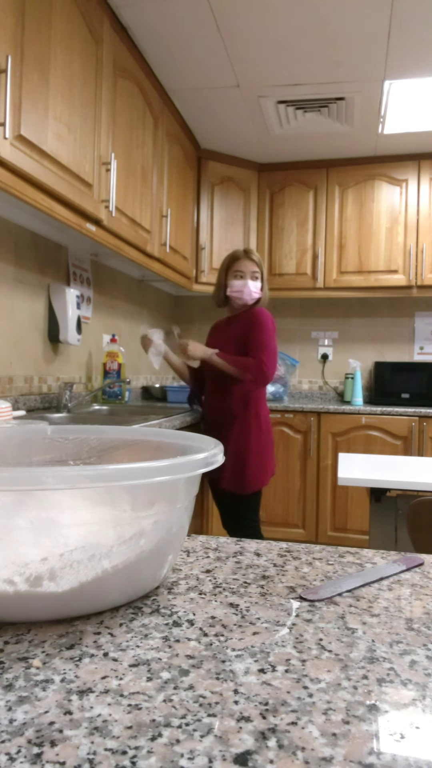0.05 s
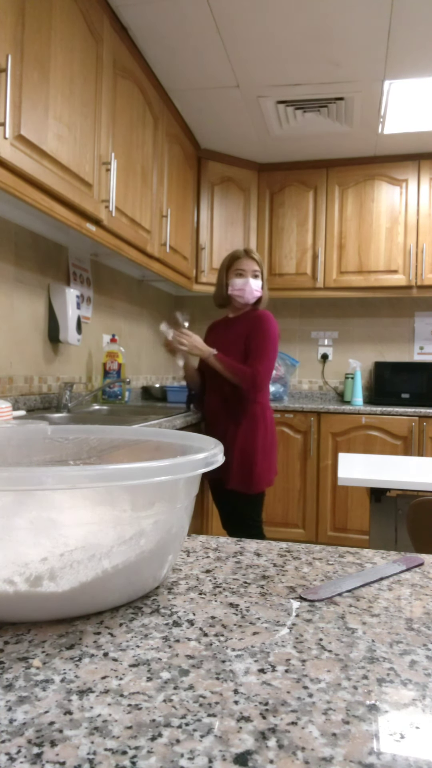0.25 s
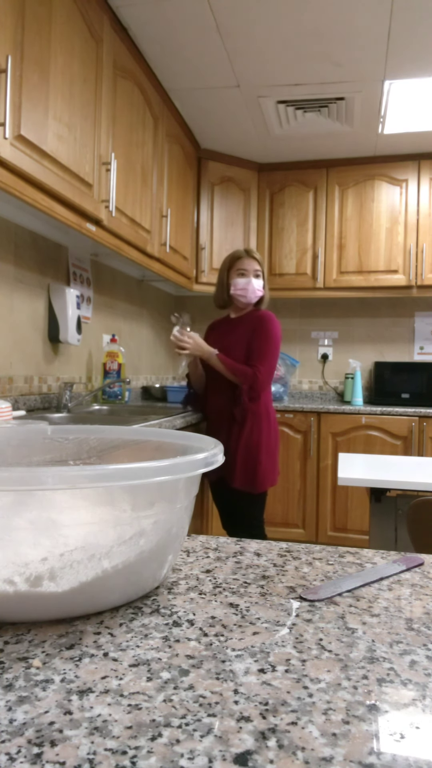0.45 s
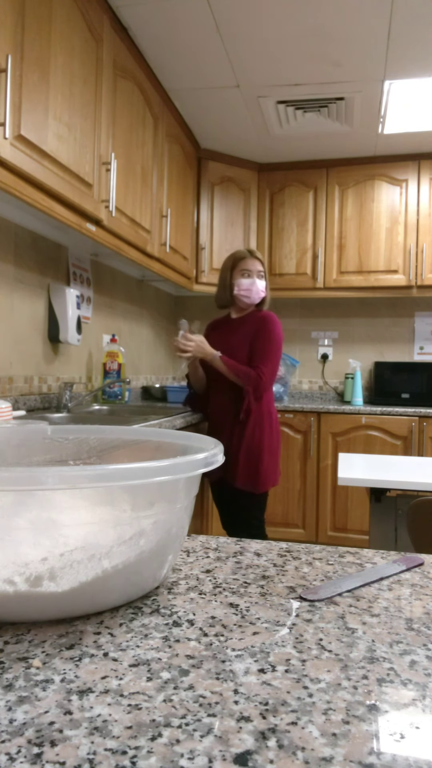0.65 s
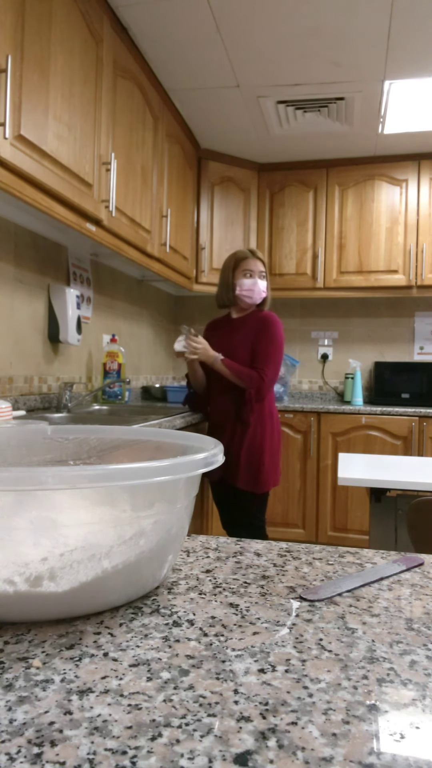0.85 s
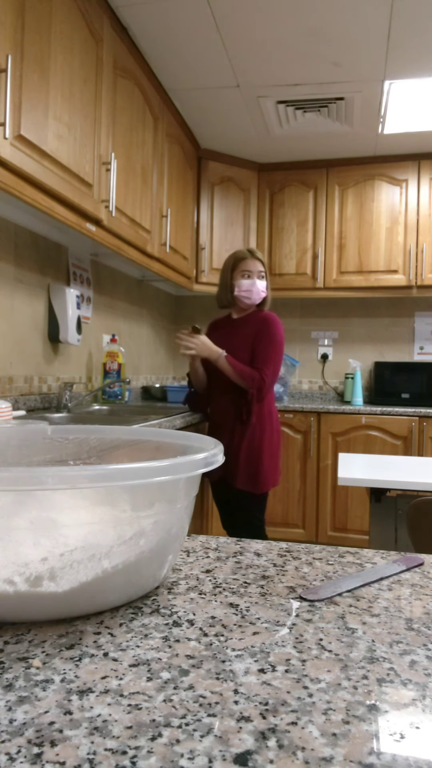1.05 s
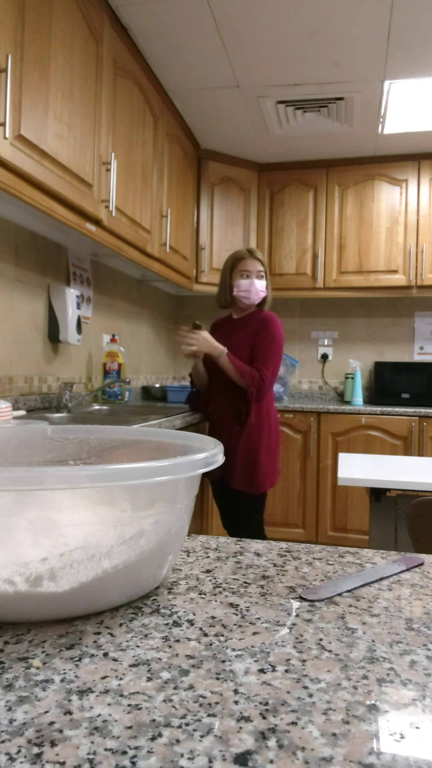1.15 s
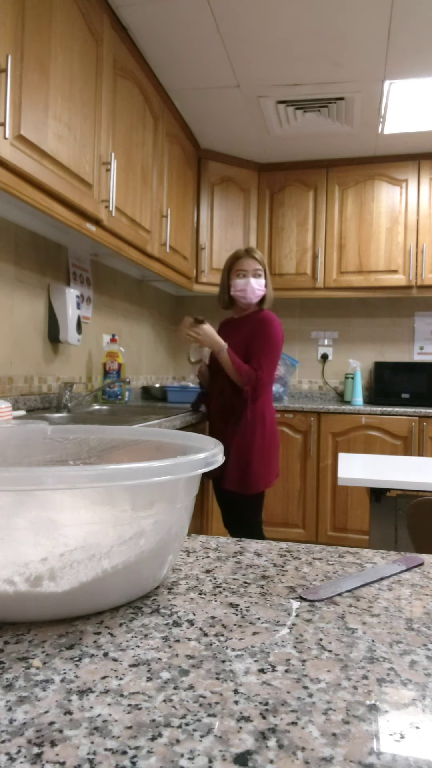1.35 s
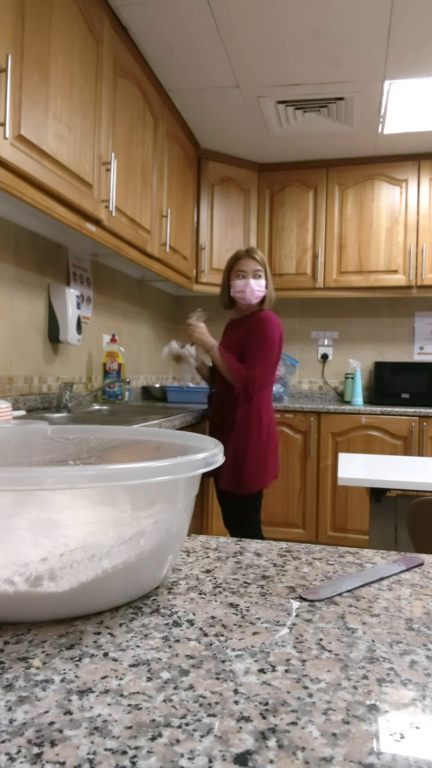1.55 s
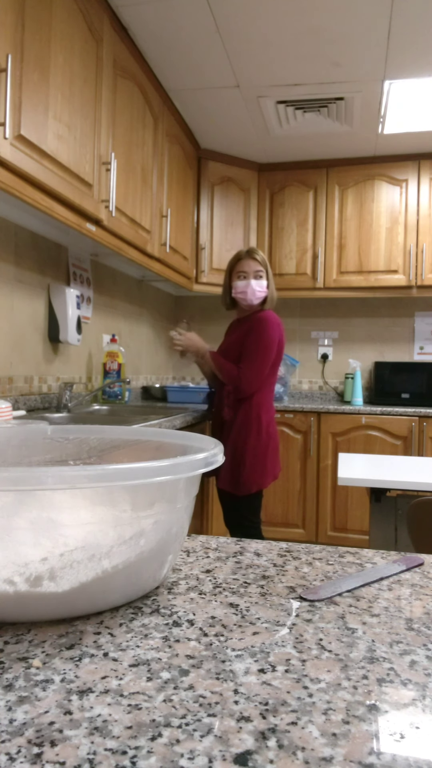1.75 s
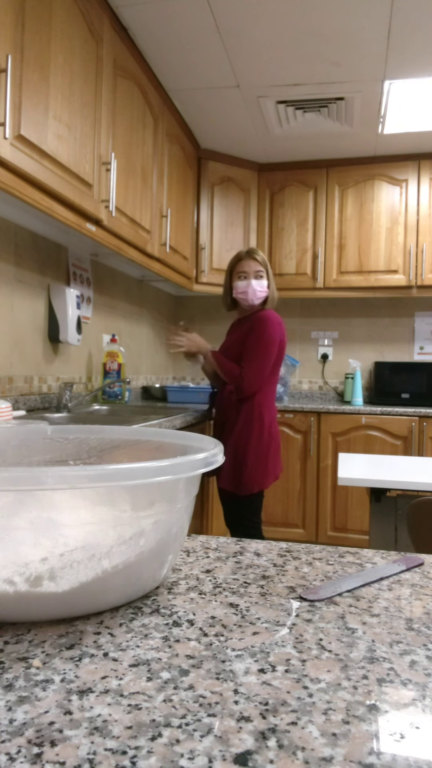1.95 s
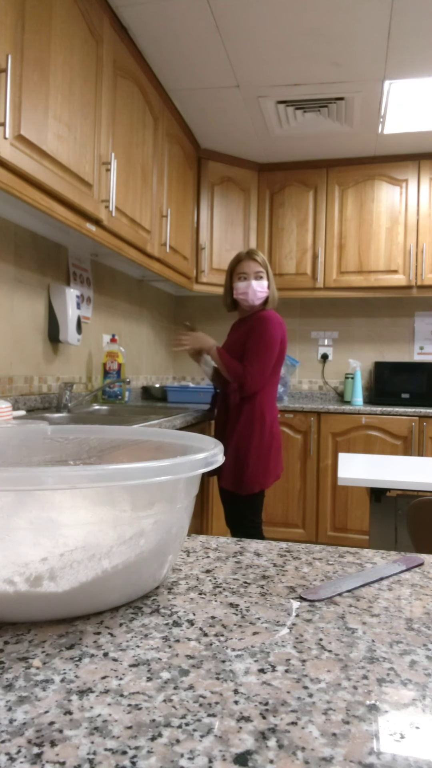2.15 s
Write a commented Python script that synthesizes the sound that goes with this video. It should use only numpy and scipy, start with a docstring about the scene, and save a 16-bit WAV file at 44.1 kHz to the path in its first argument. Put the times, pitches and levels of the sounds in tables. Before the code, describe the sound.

Metal bangles clink and rattle in short bright clusters while hands rub and softly pat dough. A ceiling vent hums and hisses throughout in a hard-walled kitchen, the hands a few steps from the microphone, to the left.

```python
"""A hard-walled kitchen, the microphone a few steps from someone working dough, off to the left.
A ceiling vent hums and hisses throughout; faint hollow swells come and go behind it.
The palms rub the dough in strokes of hiss and low rustle, and pat it softly.
Small metal pieces on the moving hands, probably bangles, knock together and ring:
bright clinks and rattles that the walls throw back."""
import sys
import numpy as np
from scipy import signal
from scipy.fft import rfft, irfft
from scipy.io import wavfile
from scipy.ndimage import uniform_filter1d

SR = 44100
rng = np.random.default_rng(int(sys.argv[2]) if len(sys.argv) > 2 else 0)


def output_pcm(signal):
    """Save a mono or channel-first signal as 16-bit PCM at the path in sys.argv[1].

    Samples are clipped to [-1, 1] before scaling.
    """
    pcm = np.clip(np.atleast_2d(signal).T, -1, 1) * 32767
    wavfile.write(sys.argv[1], SR, np.round(pcm).astype(np.int16))


N = 97020
TIME = np.arange(N) / SR
BIN_HZ = np.maximum(np.arange(N // 2 + 1) * SR / N, 1)


def from_db(db):
    """Decibels to gain."""
    return 10 ** (np.asarray(db) / 20)


def unit_rms(x):
    """Scale to unit power."""
    return x / np.sqrt(np.mean(x ** 2) + 1e-20)


def at_hz(points, hz=BIN_HZ):
    """Read a table on a log-frequency axis."""
    f, values = np.transpose(points)
    return np.interp(np.log(hz), np.log(f), values)


def pan(left_db):
    """Left and right gains for a level difference at the microphone."""
    return from_db(np.array([[.5], [-.5]]) * left_db)


def decay(start, t60):
    """An envelope that jumps to one and falls 60 dB in t60 seconds."""
    return (TIME >= start) * np.exp(-np.log(1000) * np.maximum(TIME - start, 0) / t60)


def noise(colour_db):
    """Mono noise of unit power with the given spectral shape."""
    return unit_rms(irfft(rfft(rng.standard_normal(N)) * from_db(colour_db), N))


# How alike the microphone's two sides are: f/Hz, likeness (capped at 1)
LIKENESS = [(50, 0.8), (200, 1.15), (400, 1.3), (700, 0.19), (1500, 0), (15000, 0)]
# How much louder its left side is: f/Hz, level/dB
LEFT_LEAN = [(50, .3), (300, 2.1), (700, 1.6), (1600, 6.6), (3500, 4.4), (7000, 4.1), (10000, 10.3),
             (14000, 12.5)]
def diffuse(colour_db):
    """Unit-power stereo noise from all around, alike in the bass and leaning left in the treble."""
    mid, side = rfft(rng.standard_normal((2, N)))
    alike = np.clip(at_hz(LIKENESS), -1, 1)
    both = np.sqrt(1 + alike) * mid + np.sqrt(1 - alike) * side * [[1], [-1]]
    return unit_rms(irfft(both * from_db(colour_db) * pan(at_hz(LEFT_LEAN)), N))


def resonance_db(hz, width_hz):
    """The spectral shape of a steep-sided resonance."""
    return -20 * np.log10(1 + ((BIN_HZ - hz) / width_hz) ** 2)


# Faint swells behind the vent: peak t/s, length/s, f/Hz, width/Hz, level/dB
SWELLS = [(.01, 0.051, 438, 49, -52), (0.039, 0.08, 869, 22, -48.5), (1.294, 0.046, 335, 27, -54.5),
          (1.358, 0.12, 438, 49, -58.5), (1.792, 0.049, 303, 18, -54.5), (1.889, 0.069, 293, 22, -51),
          (1.88, 0.081, 460, 44, -57), (1.887, 0.093, 668, 23, -58.5), (2.105, 0.091, 278, 25, -55),
          (2.115, 0.061, 432.3, 34.5, -53.5)]
def swells():
    """Narrow low bands of noise rise and fade with a hollow sound."""
    out = 0
    for t, length, hz, width, db in SWELLS:
        envelope = np.exp(-2 * ((TIME - t) / length) ** 2)
        out += from_db(db) * envelope * diffuse(resonance_db(hz, width))
    return out


# Air from the vent overhead: f/Hz, relative level/dB
AIR_SPECTRUM = [(25, -30), (50, 5), (80, -1), (125, -0.5), (220, 4.5), (350, -2), (480, 0), (700, -5),
                (1200, -8.5), (2000, -11), (2800, -6.5), (7000, -5), (15000, -20)]
# Resonances of its duct: f/Hz, width/Hz, level/dB
DUCT_MODES = [(48.3, 7.9, -67), (167, 7, -57.5), (174.4, 27, -63.5), (198.7, 12.4, -54.5),
              (263.7, 3.1, -65), (293.4, 5.1, -71.5)]
# Course of the fan's hum: t/s, relative level/dB, f/Hz
FAN_HUM = [(0.0, -53, 181), (0.042, -35, 201), (0.08, -52, 181.5), (0.101, -35, 185), (0.17, -85, 178.6),
           (0.2, -71, 180.4), (0.31, -48, 175.2), (0.38, -76, 187.2), (0.458, -45.5, 176),
           (0.76, -41.5, 176.1), (0.91, -45.5, 179.4), (0.95, -37, 178), (0.98, -65, 196.5),
           (1.039, -42, 176.8), (1.08, -63, 200.3), (1.16, -45.5, 185.2), (1.19, -54, 186.2),
           (1.27, -42.5, 182.3), (1.32, -39, 192.6), (1.38, -59, 191.9), (1.46, -43.5, 185.8),
           (1.51, -60, 187.5), (1.59, -42, 192.5), (1.72, -50.5, 188.2), (1.81, -43, 180.3),
           (1.839, -38.5, 194.9), (1.991, -45, 194.5), (2.081, -43, 190), (2.16, -48, 177.7),
           (2.2, -66, 181)]
def vent(air_db=-52.5, hum_trim_db=-2):
    """The ceiling vent: rushing air, a resonating duct and a fan hum wavering in pitch and level."""
    air = from_db(air_db) * diffuse(at_hz(AIR_SPECTRUM))
    duct = sum(from_db(db) * diffuse(resonance_db(hz, width)) for hz, width, db in DUCT_MODES)
    t, db, hz = np.transpose(FAN_HUM)
    phase = 2 * np.pi * np.cumsum(np.interp(TIME, t, hz)) / SR
    hum = from_db(hum_trim_db + np.interp(TIME, t, db)) * np.sqrt(2) * np.sin(phase)
    return air + duct + hum * pan(left_db=1.5)


def evened(response, band_hz=70):
    """Level each band of a room response with its neighbours, so that no pitch sticks out."""
    spectrum = rfft(response)
    power = uniform_filter1d(np.abs(spectrum) ** 2, size=int(band_hz * N / SR))
    broad = uniform_filter1d(power, size=int(10 * band_hz * N / SR))
    return irfft(spectrum * np.sqrt(broad / power), N)[:, :N // 2]


# Reverberation between the hard walls: f/Hz, T60/s
ROOM_T60 = [(200, 0.13), (2000, 0.43), (8000, 0.35), (15000, 0.24)]
def kitchen(x, build_s=0.0083, early_s=0.0037):
    """The path to the microphone: direct sound, quick reflections off the cupboards, a short tail."""
    wash = rfft(diffuse(0))
    half_octave = np.clip(np.round(2 * np.log2(BIN_HZ / 1000)), 0, 8)
    tail = 0
    for k in np.unique(half_octave):
        band = half_octave == k
        tail += irfft(wash * band, N) * decay(0, at_hz(ROOM_T60, BIN_HZ[band].mean()))
    tail = unit_rms(tail * (1 - np.exp(-TIME / build_s))) / np.sqrt(N)
    early = unit_rms(diffuse(0) * TIME * np.exp(-2 * TIME / early_s)) / np.sqrt(N)
    direct = (TIME == 0) * from_db(-5) * pan(left_db=13) / np.sqrt(2)
    response = evened(direct + from_db(-0.5) * tail + from_db(-2.5) * early)
    return signal.fftconvolve(x[None], response, axes=1)[:, :N]


# Palm strokes a few steps off, before smoothing: peak t/s, length/s, hiss level/dB, rustle level/dB
STROKES = [(0.074, 0.023, -44, -59), (0.222, 0.089, -43, -85), (0.318, 0.083, -38, -87),
           (0.436, 0.026, -33.5, -55), (0.512, 0.09, -33.5, -51), (0.65, 0.046, -37, -48.5),
           (0.746, 0.049, -37, -45.5), (0.848, 0.063, -41.5, -47), (0.938, 0.1, -46, -54),
           (1.032, 0.036, -38, -50.5), (1.09, 0.022, -36.5, -45.5), (1.149, 0.037, -39.5, -51.5),
           (1.32, 0.092, -39.5, -67), (1.49, 0.1, -43, -63), (1.774, 0.12, -46.5, -50),
           (1.895, 0.12, -38.5, -49), (2.026, 0.12, -41, -49), (2.115, 0.061, -43.5, -50.5),
           (2.193, 0.059, -58, -47.5)]
# Their hiss and their low rustle: f/Hz, relative level/dB
HISS_SPECTRUM = [(600, -22), (1200, -15.5), (2000, -1), (2800, -3), (4500, 3), (7500, 3), (10000, -1),
                 (15000, -9.5)]
RUSTLE_SPECTRUM = [(50, -37), (130, 7.5), (290, -15.5), (450, 1), (600, -6.5), (850, -0.5), (1250, -7.5),
                   (2000, 2.5), (4000, -20.5)]
def palm_rubs(linger_s=0.026):
    """Each stroke over the dough swells and fades as a hiss over a rustle, and lingers in the room."""
    power = np.zeros((2, N))
    for t, length, hiss_db, rustle_db in STROKES:
        swell = np.exp(-(2 * (TIME - t + linger_s / 2) / length) ** 2)
        power += swell * from_db([[hiss_db], [rustle_db]]) ** 2
    pole = np.exp(-1 / (linger_s * SR))
    hiss, rustle = np.sqrt(signal.lfilter([1 - pole], [1, -pole], power + 1e-18))
    return hiss * diffuse(at_hz(HISS_SPECTRUM)) + rustle * diffuse(at_hz(RUSTLE_SPECTRUM))


# Soft pats, at the hands: t/s, level/dB
PATS = [(0.531, -42), (.542, -44), (1.861, -49), (1.895, -48)]
# Colour of a pat: f/Hz, relative level/dB
PAT_SPECTRUM = [(50, -23), (150, -13), (250, -2), (450, 1), (750, 9.5), (1000, -11), (1500, 10),
                (2500, -23), (5000, -45)]
def palm_pats(t60=0.048):
    """Palm meets dough in dull, short bursts of noise."""
    return sum(from_db(db) * noise(at_hz(PAT_SPECTRUM)) * decay(t, t60) for t, db in PATS)


# Ringing modes of each bangle: f/Hz, relative level/dB, T60/s
BANGLE_MODES = { "first": [(3986, -14, 0.17), (4150, -11, 0.049), (4260, -6, 0.061), (5080, -10, 0.049),
                (7560, -8, 0.094), (8600, -17, .08), (8940, -4, .16), (9044, -13, .08), (10140, -26, 0.047),
                (12440, -11.5, 0.096), (12600, -20, .11), (12900, -13, .14), (13870, 3, 0.059),
                (15470, -22, .07)], "second": [(3963, -19, 0.052), (4184, -11.5, 0.034),
                (5093, -6.5, 0.097), (5150, -9.5, 0.028), (6903, -7.5, 0.11), (7410, -4, 0.034),
                (7546, -1.5, 0.057), (8000, -5, 0.036), (10000, -11.5, 0.064), (11150, -5, .1),
                (11138, -3, 0.057), (12180, -5.5, 0.032), (12200, -7, .03), (14190, -4, 0.04)],
                "third": [(3347, -3.5, 0.011), (10370, -2.5, 0.046), (10800, -10, 0.022), (11200, -14, .04),
                (11950, 1.5, 0.026), (13800, -14, 0.042), (13900, -3, 0.037), (14500, -3, 0.045),
                (15100, -9, .035)], "fourth": [(3630, -8.5, 0.046), (4164, -7, 0.077), (4640, -12, 0.071),
                (5086, 4, 0.035), (5140, -2, .025), (5530, -5.5, 0.037), (6610, 1.5, 0.074), (7680, 3, .07),
                (8850, 1.5, 0.11), (10700, -8, 0.3), (12570, 5, 0.047), (14100, 0, .06), (14800, -11, .09)]}
# Each bangle's clash, the noise of many short-lived modes: f/Hz, relative level/dB
CLASH_SPECTRA = { "first": [(500, -45), (1200, -28), (1800, -20), (2800, -23), (4200, -1), (5900, -7.5),
                 (8500, 4), (11500, -5.5), (12800, -13), (15500, -3)], "second": [(1100, -34),
                 (1700, -16.5), (2900, -19.5), (4400, -10), (5900, -17.5), (8200, 1.5), (9600, 1),
                 (11300, 4), (13300, -10), (15500, 1.5)], "third": [(500, -43), (1200, -20), (1800, -9),
                 (2800, -23), (4200, -7.5), (5900, -8), (8200, -1), (11000, -2.5), (13000, -1), (15500, 2)],
                 "fourth": [(500, -43), (1200, -14.5), (1800, -11.5), (2800, -15), (4200, -11.5),
                 (5900, -9), (7800, -0.5), (11000, 0), (13000, -4), (15500, 0)]}
# Contacts at the hands: t/s, bangle, relative ring level/dB, relative clash level/dB, tilt/(dB/octave)
CLINKS = [(0.2372, "first", -25.5, -30, -2.5), (0.242, "first", -26.5, -20, -0.5),
          (0.488, "first", -14, -14, 3), (0.526, "fourth", -28, -11, -0.5),
          (0.5297, "fourth", -23.5, -18, -1.5), (0.542, "third", -26, -23.5, -3),
          (1.526, "second", -20, -30, 2.5), (1.531, "second", -17.5, -15, 0.5),
          (1.603, "second", -45, -21.5, -1.5), (1.614, "second", -27, -19, 0.5),
          (1.624, "second", -30.5, -14.5, 4), (1.642, "second", -40, -17, 3),
          (1.674, "second", -50, -24.5, -3), (1.146, "third", -45, -36, -1),
          (1.7913, "first", -30, -20.5, 8.5), (1.802, "second", -32.5, -33, 12),
          (1.861, "third", -15, -19, 1.5), (1.867, "third", -21.5, -19, -1.5),
          (1.883, "third", -35, -14, 14)]
def bangles(contact_s=0.0009, pivot_hz=9500, low_cut_hz=1380, spread_db=2.05):
    """Each contact rings one bangle's modes and adds a hard tick and a short bright clash."""
    out, age = np.zeros(N), TIME[:SR // 2]
    attack = 1 - np.exp(-age / contact_s)
    for t, bangle, ring_db, clash_db, tilt in CLINKS:
        ring, start = np.zeros(N + SR), int(t * SR)
        for hz, db, t60 in BANGLE_MODES[bangle]:
            mode_db = ring_db + db + tilt * np.log2(hz / pivot_hz) + spread_db * rng.standard_normal()
            envelope = attack * np.exp(-np.log(1000) * age / t60)
            ring[start:start + len(age)] += from_db(mode_db) * envelope * np.sin(2 * np.pi * hz * age)
        octaves = np.log2(np.maximum(BIN_HZ, low_cut_hz) / pivot_hz)
        clash = from_db(clash_db) * noise(at_hz(CLASH_SPECTRA[bangle]) + tilt * octaves)
        tick = from_db(-5.5) * decay(t, t60=0.0066)  # the hard instant of contact
        out += ring[:N] + clash * (decay(t, t60=0.056) + tick)
    return signal.sosfilt(signal.butter(2, low_cut_hz, "high", fs=SR, output="sos"), out)


def scene():
    """From the microphone: hands and bangles to the left, over the vent and the swells."""
    pats = palm_pats()
    through_room = kitchen(bangles() + from_db(-8.5) * pats)
    return through_room + pan(left_db=7) * pats + palm_rubs() + vent() + swells()


def record(dry, cutoff_hz=15480):
    """The microphone's signal, with the top treble cut steeply."""
    return signal.sosfiltfilt(signal.ellip(10, .05, 60, cutoff_hz, fs=SR, output="sos"), dry)


dry = scene()
out = record(dry)
output_pcm(out)
```